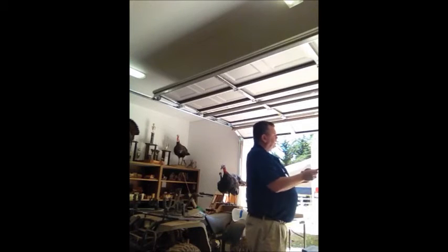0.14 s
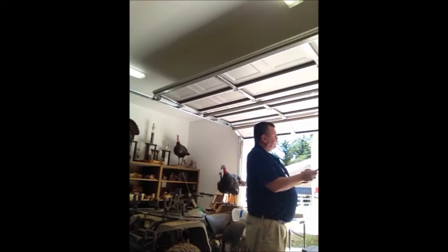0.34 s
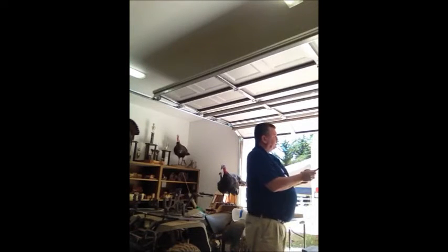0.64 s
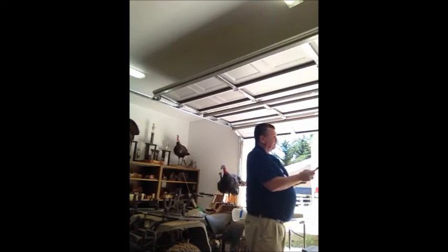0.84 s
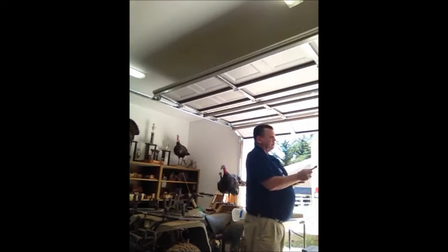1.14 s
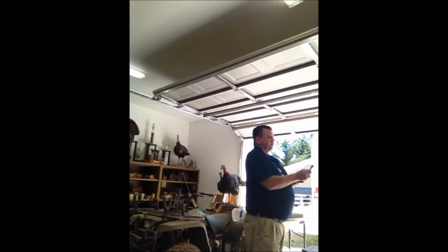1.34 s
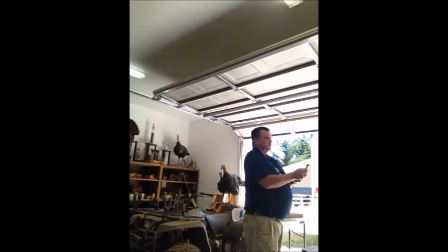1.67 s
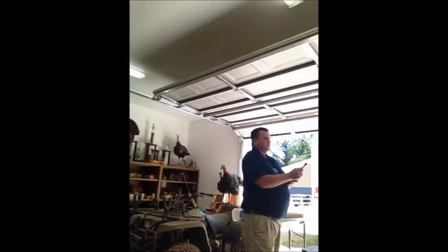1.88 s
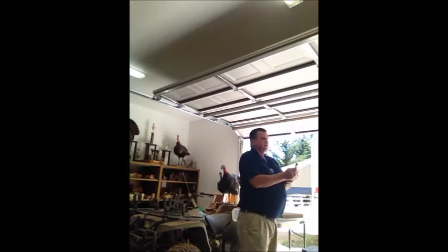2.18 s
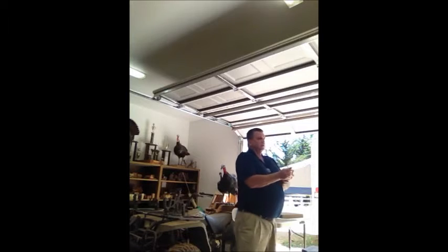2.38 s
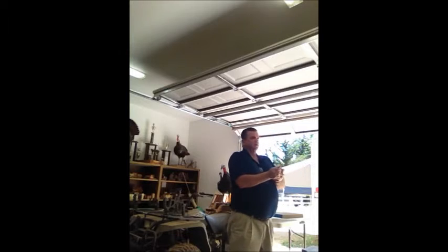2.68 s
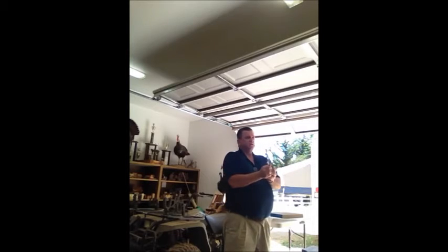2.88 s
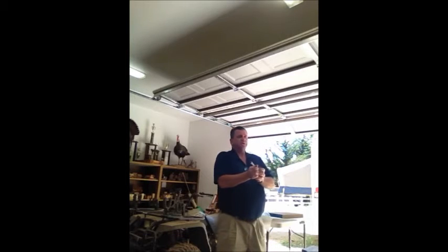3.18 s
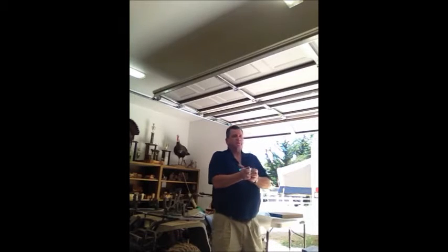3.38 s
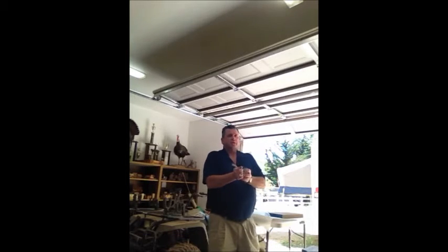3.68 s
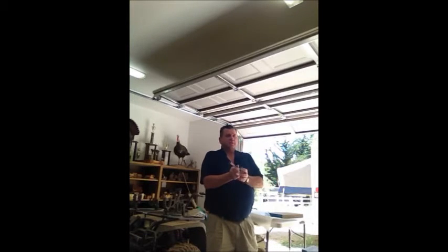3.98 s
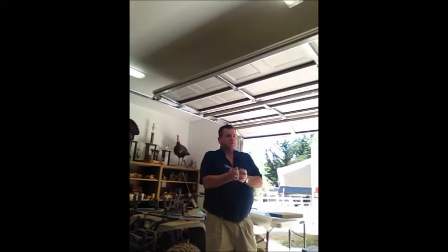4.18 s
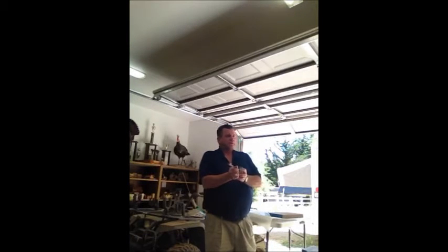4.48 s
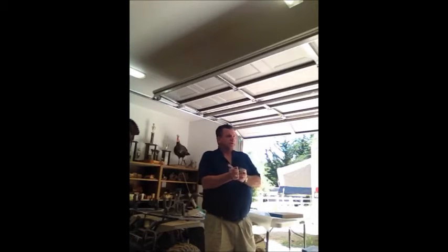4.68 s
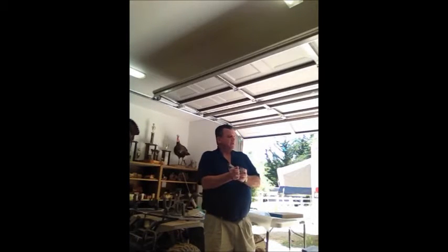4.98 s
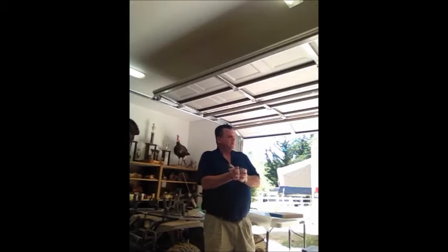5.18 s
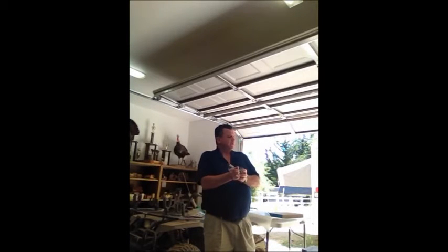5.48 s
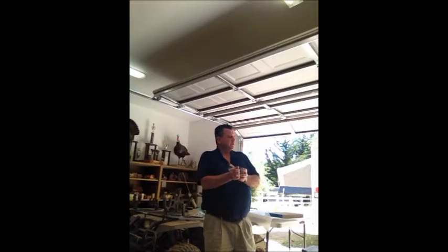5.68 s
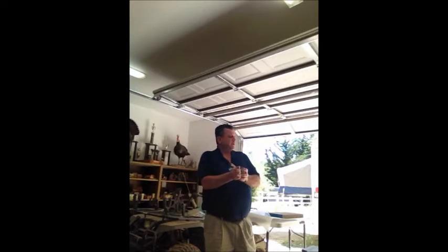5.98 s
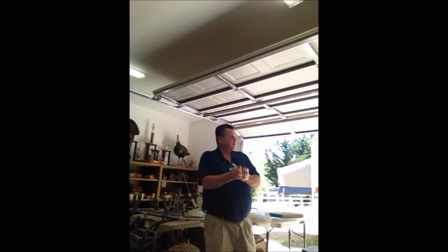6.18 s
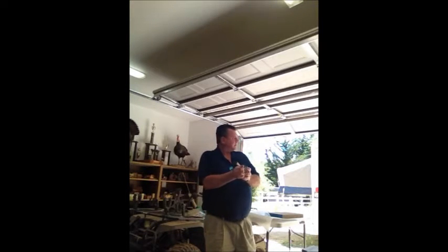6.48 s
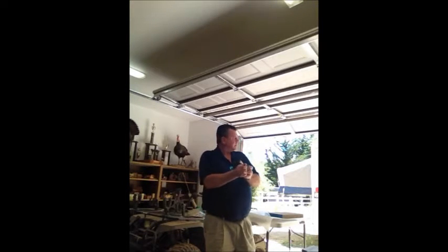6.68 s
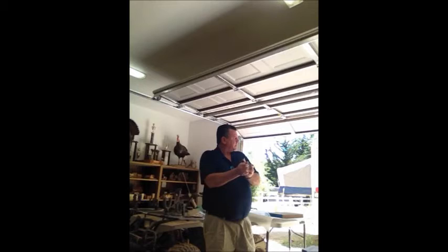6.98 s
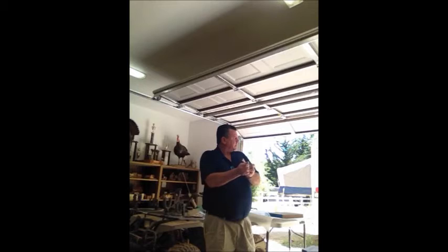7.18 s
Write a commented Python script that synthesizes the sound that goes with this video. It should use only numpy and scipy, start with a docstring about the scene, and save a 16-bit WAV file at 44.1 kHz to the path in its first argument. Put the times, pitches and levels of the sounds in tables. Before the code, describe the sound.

Hand-scraped turkey call: thin squeaks breaking into harsh, nasal yelps, about three a second at the fastest, then silence and two clucks in a bare garage.

```python
"""An open garage: a hand-held friction turkey call played a few metres from a phone.
Each stroke starts as a thin stick-slip whistle, then breaks down into a loud rasp: eleven yelps,
a light touch of the striker and two short clucks. Slip pulses and grit noise ring the plate and chamber.
Filtered noise makes the outdoor hush, a far rush and faint handling rustles.
The bare room rings on as decaying noise; the phone limits the peaks."""
import sys
import numpy as np
from scipy import signal
from scipy.fft import rfft, irfft
from scipy.io import wavfile
from scipy.ndimage import uniform_filter1d, minimum_filter1d

SR = 44100
rng = np.random.default_rng(int(sys.argv[2]) if len(sys.argv) > 2 else 0)


def dump(signal):
    """Clip the signal to [-1, 1] and save it as 16-bit WAV at the path in sys.argv[1]."""
    limited = np.clip(np.atleast_2d(signal).T, -1, 1)
    pcm = np.round(limited * 32767).astype(np.int16)
    wavfile.write(sys.argv[1], SR, pcm)


N = 323694
TOP_HZ = 15500  # top of the slip overtones and of the phone's band


def undb(db):
    """Decibels to gain."""
    return 10 ** (np.asarray(db) / 20)


def unit(x):
    """Scale to rms 1."""
    return x / np.sqrt(np.mean(x ** 2))


def on_log_axis(points, hz):
    """Read (Hz, value) points on a log-frequency axis."""
    at, value = np.transpose(points)
    return np.interp(np.log(np.maximum(hz, 1)), np.log(at), value)


def noise(points):
    """Noise of rms 1, coloured by a curve of (frequency, level) points."""
    hz = np.fft.rfftfreq(N, 1 / SR)
    white = rng.standard_normal(N)
    return unit(irfft(rfft(white) * undb(on_log_axis(points, hz)), N))


def wander(t, rate):
    """Random drift: normal values, rate of them a second, joined by lines."""
    values = rng.standard_normal(4096)
    return np.interp(t * rate, np.arange(len(values)), values)


def add(track, at, sound):
    """Mix a sound into the track at a time in seconds."""
    i = int(at * SR)
    track[i:i + len(sound)] += sound[:N - i]


# colour of the outdoor hush: (frequency [Hz], relative level per Hz [dB])
HUSH_COLOUR = [(25, -26.5), (70, -18.5), (125, -2), (200, -1.5), (330, -5.5), (750, -7.5), (1100, -5.5),
               (2000, -12.5), (4400, -15.5), (5200, -18), (10000, -23), (14500, -21)]
HUSH_DB = -67


def outdoor_hush(t):
    """Air noise through the open door, with a slight flutter in level."""
    return noise(HUSH_COLOUR) * undb(HUSH_DB + 0.46 * wander(t, 9))


# colour of the far, hollow rush: (frequency [Hz], relative level per Hz [dB])
FAR_COLOUR = [(200, -30.5), (520, -9.5), (820, -2), (980, -6), (1150, -8.5), (1700, -15.5), (4000, -37)]
FAR_DB, FAR_SWELL_S = -69, 6.3  # mean level on reaching the swell time; the rise goes on after it


def far_rush(t):
    """A hollow band of noise outdoors that swells in a straight line from nothing."""
    return noise(FAR_COLOUR) * t / FAR_SWELL_S * undb(FAR_DB + wander(t, 4))


# colour of the rustle: (frequency [Hz], relative level per Hz [dB])
RUSTLE_COLOUR = [(60, -30), (250, -13), (400, -0.5), (600, -7), (1800, -5.5), (2400, -11), (4400, -10.5),
                 (6000, -20), (15000, -21)]
# faint rustles of handling: (middle [s], half length [s], level at the middle [dB])
RUSTLES = [(.01, 0.16, -61), (0.66, 0.11, -66.5)]


def handling_rustle(t):
    """Hands shifting on the call: soft bell-shaped swells of uneven noise."""
    handling = sum(undb(db) * np.exp(-((t - middle) / half) ** 2) for middle, half, db in RUSTLES)
    return noise(RUSTLE_COLOUR) * handling * undb(1.5 * wander(t, 40))


# garage reverberation: (frequency [Hz], time to fall by 60 dB [s])
REVERB_TIMES = [(300, 0.51), (1350, 0.7), (2000, 0.56), (3000, 0.65), (4200, 0.63), (8000, 0.52),
                (14000, 0.34)]


def garage(x, early_db=-5, early_s=0.0095, tail_db=-6, direct_db=-1.0):
    """Direct sound, a quick cluster off door and ceiling, and a diffuse tail that dulls as it fades."""
    t = np.arange(SR) / SR
    hz, frames, cells = signal.stft(rng.standard_normal(SR), SR, nperseg=256)
    fading = np.exp(-np.log(1000) * frames / on_log_axis(REVERB_TIMES, hz)[:, None])
    tail = signal.istft(cells * fading, SR)[1][:SR]
    tail = tail * (1 - np.exp(-t / 0.0039))  # the tail builds up softly
    sparse = rng.standard_normal(SR) * (rng.random(SR) < .012)
    early = sparse * np.exp(-t / early_s) * (t > .002)
    response = (undb(tail_db) * unit(tail) + undb(early_db) * unit(early)) / np.sqrt(SR)
    return undb(direct_db) * x + signal.fftconvolve(x, response)[:N]


# broad response of plate and sound chamber: (frequency [Hz], level [dB])
BODY = [(60, -58), (200, -46.5), (470, -43.5), (640, -38), (860, -35), (1060, -19), (1280, -0.5),
        (1950, -4), (2230, -20.5), (2680, -17.5), (3200, -20), (4650, -25.5), (5200, -33.5), (7300, -34.5),
        (15000, -56)]
# plate modes and dips on top of it: (frequency [Hz], width [Hz], lift [dB])
PLATE_MODES = [(1361, 75, 2.5), (1640, 110, 3), (1770, 170, 1), (2464, 160, -8), (2898, 70, 6),
               (3010, 55, 8), (3208, 40, 8.5), (3416, 120, -8), (3950, 30, 3), (4036, 60, 6),
               (5100, 150, -7), (5755, 130, 8.5), (6490, 140, 6), (6870, 93, 7.5), (7720, 80, 6),
               (8570, 470, -6), (9360, 120, 7), (10120, 230, 5.5), (11610, 180, 11), (12900, 400, 4.5)]
# a narrow anti-resonance of the chamber, before tuning: (frequency [Hz], width [Hz], lift [dB])
HOLLOW = (2255, 90, -18)


def body(bite_db, tuning=1, size=4096):
    """Causal impulse response of the call; a harder bite lifts the overtones, the hand tunes the chamber."""
    hz = np.fft.rfftfreq(size, 1 / SR)
    bite_weight = on_log_axis([(1900, 0.088), (3000, 0.89), (10000, 2.0)], hz)
    db = on_log_axis(BODY, hz / tuning) + bite_db * bite_weight
    hollow = (HOLLOW[0] * tuning, *HOLLOW[1:])
    for centre, width, lift_db in PLATE_MODES + [hollow]:
        db = db + lift_db / (1 + (2 * (hz - centre) / width) ** 2)
    # fold the cepstrum to get minimum phase: the ring starts at once
    cepstrum = irfft(np.log(undb(db)))
    cepstrum[1:size // 2] *= 2
    cepstrum[size // 2 + 1:] = 0
    return irfft(np.exp(rfft(cepstrum)))


# the striker touches the plate: (start [s], length [s], level before the room [dB])
TOUCH = (6.110, 0.031, -42)


def light_touch(call, bite_db=-10):
    """A brief soft scuff of the striker: a fading noise burst rings the plate."""
    start, length, db = TOUCH
    t = np.arange(int(length * SR)) / SR
    push = (1 - np.exp(-t / .002)) * np.exp(-2 * t / length)
    scuff = rng.standard_normal(SR)[:len(t)] * push
    sound = signal.fftconvolve(scuff, body(bite_db))
    add(call, start, sound * undb(db) * np.sqrt(len(t) / np.sum(sound ** 2)))


def slips(phase, hz, odd, roll_db, count=22):
    """Pulses, two a cycle; as the odd harmonics near full strength every second pulse drops out."""
    k = np.arange(1, count + 1)[:, None]
    roll = undb(roll_db * np.log2(np.maximum(k / 2, 1)))  # soft slips lose overtones
    strength = np.where(k % 2, odd, 1) * roll
    in_band = k * hz < TOP_HZ
    return np.sum(np.cos(k * phase) * in_band * strength, axis=0)


# the opening whistle: strength of its odd harmonics, fall of its overtones [dB per octave]
WHISTLE_ODD, WHISTLE_ROLL_DB = 0.31, -8
# extra strength of its lowest tone; longest fade-in [s]
WHISTLE_FUNDAMENTAL, WHISTLE_FADE_S = .35, .008
SMOOTH_ODD, RASP_ODD = .55, .98  # odd harmonics at the break, in a smooth and in a fully rough stroke
STUMBLE, STUMBLE_RATE = .12, 70  # deepest slowing of the slips (share), chances a second
SING_HZ, SING_SPREAD = 1655, .025  # plate tone before tuning, its spread between strokes (share)
SCRAPE, SPURT_DB = 1.7, 4.5  # grit at full roughness against the slips, typical swing of its spurts
EASE_S, EASE_DB = 0.028, -4.5  # after the break the bite eases off: time constant, change of bite
BEND, LIFT_S = .012, .0028  # slow pitch bend at full roughness (share), time constant of the lift-off


def stroke(snap, length, high_hz, low_hz, db, opening_db, rasp, bite_db, tuning=1, knock=0, sing=1):
    """Stick-slip grips harder until the break at snap seconds: slips slow, sharpen, grow loud and uneven."""
    t = np.arange(int((length + .05) * SR)) / SR  # leaves room for the lift-off
    progress = np.clip(t / snap, 0, 1)
    # the pitch sags gently at first, then drops over the break; rough strokes sag sooner and further
    drop = (.28 + .34 * rasp) * progress ** (1.8 - .6 * rasp)
    drop = drop + (1 - drop[-1]) * progress ** 12
    hz = high_hz + (low_hz - high_hz) * drop
    rough = .07 + rasp * drop ** 1.24

    # the pitch wavers, and rough slips stumble now and then to a slower rate
    waver = (.012 + .022 * rough) * wander(t, 600)
    waver = waver + (.007 + .012 * rough) * wander(t, 90.2) + BEND * rough * wander(t, 30)
    stumble = STUMBLE * rasp ** 2 * drop ** 4 * np.clip(4 * wander(t, STUMBLE_RATE) - 2.2, 0, 1)
    phase = 2 * np.pi * np.cumsum(hz * (1 + waver - stumble)) / SR

    # in the rasp single slips come early or late, and strong and weak ones alternate
    break_odd = SMOOTH_ODD + (RASP_ODD - SMOOTH_ODD) * rasp
    odd = WHISTLE_ODD + (break_odd - WHISTLE_ODD) * drop ** 2
    jitter = (0.043 + .13 * rough) * wander(t, 900)
    pulses = slips(phase + jitter, hz, odd, WHISTLE_ROLL_DB * (1 - progress))
    alternation = 0.26 * rough * np.cos(phase / 2 + 1.1 * wander(t, 120))
    pulses = pulses * (1 + alternation + .5 * rough * wander(t, 600))

    # a plate tone sings against the slips and shakes the contact, which adds sum and difference tones
    detune = 1 + SING_SPREAD * rng.standard_normal() + .016 * wander(t, 150)
    plate_hz = SING_HZ * tuning ** .7 * detune
    plate = sing * rough * np.cos(2 * np.pi * np.cumsum(plate_hz) / SR)
    fundamental = (knock + WHISTLE_FUNDAMENTAL * (1 - drop) ** 2) * np.cos(phase)
    pulses = pulses * (1 + .7 * plate) + 0.68 * plate + fundamental

    # the tip scrapes over the grit in ragged spurts
    scrape = SCRAPE * rough * rng.standard_normal(SR)[:len(t)] * undb(SPURT_DB * wander(t, 400))

    # light strokes stay quiet until just before the break; rough ones swell evenly
    grip = np.minimum(progress / (.92 - .12 * rasp), 1) ** (2.8 - 2.3 * rasp)
    lift = np.exp(-np.maximum(t - length, 0) / LIFT_S)
    fade_in = np.minimum(t / min(WHISTLE_FADE_S, snap / 2), 1)
    unsteady_db = (1.63 + 1.6 * rasp) * wander(t, 130)
    pressure = undb(opening_db * (1 - grip) + unsteady_db) * lift * fade_in

    # full bite up to the break, then a crossfade to a duller body as the hand eases off
    push = (pulses + scrape) * pressure
    fresh = np.exp(-np.maximum(t - snap, 0) / EASE_S)
    sharp = signal.fftconvolve(push * fresh, body(bite_db, tuning))
    dull = signal.fftconvolve(push * (1 - fresh), body(bite_db + EASE_DB, tuning))
    sound = sharp + dull
    return sound * undb(db) * np.sqrt(np.sum(pressure ** 2) / np.sum(sound ** 2))


# clucks: (start [s], length to lift-off [s], slip-cycle rate after the break [Hz],
#          level at full pressure before the room [dB])
CLUCKS = [(6.375, 0.046, 698.3, -8.5), (7.062, 0.016, 712, -4.5)]
CLUCK_OPEN_HZ, CLUCK_BREAK_S, CLUCK_OPENING_DB = 851, 0.00398, -12.5
CLUCK_RASP, CLUCK_BITE_DB = 0.773, 0.5  # roughness 0-1, lift of the overtones before weighting
CLUCK_KNOCK, CLUCK_SING = 0.47, 0.39  # extra fundamental, share of the plate tone stirred by a flick


def clucks(call):
    """Flicks of the striker that break almost at once: hardly any whistle, just a short bright rasp."""
    for start, length, hz, db in CLUCKS:
        sound = stroke(CLUCK_BREAK_S, length, CLUCK_OPEN_HZ, hz, db, CLUCK_OPENING_DB,
                       CLUCK_RASP, CLUCK_BITE_DB, knock=CLUCK_KNOCK, sing=CLUCK_SING)
        add(call, start, sound)


# yelps: (start [s], break into the rasp [s], lift-off [s], force on the striker [0-1],
#         level at full pressure before the room [dB])
YELPS = [ (0.689, 0.766, .820, 0.09, -17), (1.092, 1.205, 1.270, .53, -13.5),
         (1.524, 1.595, 1.666, .85, -10.5), (1.885, 1.938, 2.014, 0.91, -9.5),
         (2.238, 2.296, 2.356, .98, -9), (2.591, 2.626, 2.668, 0.98, -7.5),
         (2.905, 2.955, 3.018, 0.97, -8.5), (3.249, 3.29, 3.348, 0.95, -10),
         (3.582, 3.633, 3.711, 0.98, -10), (3.981, 4.043, 4.122, 0.98, -8), (4.384, 4.449, 4.521, 1, -10), ]
# the chamber's tuning falls as the hand settles around it: (time [s], frequency ratio [1])
CHAMBER = [(1.1, 1.094), (1.53, 1.065), (1.89, 1.0)]
# slip-cycle rate as the stroke opens: (lightest touch [Hz], full force [Hz])
WHISTLE_HZ = (964.5, 1061)
# slip-cycle rate after the break: (lightest touch [Hz], full force [Hz])
RASP_HZ = (799.7, 646.5)
# pressure of the opening against the rasp: (lightest touch [dB], full force [dB])
OPENING_DB = (-30, -17.5)
# lift of the overtones before weighting by frequency: (lightest touch [dB], full force [dB])
BITE_DB = (-7, 1)
RASP_POWER = 2.017  # roughness grows as force to this power


def yelps(call):
    """Drawn strokes: more force opens higher and louder, and breaks lower, rougher and brighter."""
    for start, snap, end, force, db in YELPS:
        high_hz, low_hz, opening_db, bite_db = (
            light + (full - light) * force
            for light, full in (WHISTLE_HZ, RASP_HZ, OPENING_DB, BITE_DB))
        rasp = np.clip(force, 0, 1) ** RASP_POWER
        tuning = np.interp(start, *np.transpose(CHAMBER))
        sound = stroke(snap - start, end - start, high_hz, low_hz, db, opening_db, rasp, bite_db, tuning)
        add(call, start, sound)


def scene():
    """The call rings in the garage, over handling rustles, the outdoor hush and the far rush."""
    t = np.arange(N) / SR
    background = outdoor_hush(t) + far_rush(t) + handling_rustle(t)
    call = np.zeros(N)
    light_touch(call)
    clucks(call)
    yelps(call)
    return (background + garage(call))[None]


def record(dry, ceiling=0.88, size=265):
    """The phone: a fast limiter holds the peaks to the ceiling, then a steep filter cuts the top."""
    gain = np.minimum(1, ceiling / (np.abs(dry) + 1e-9))
    gain = uniform_filter1d(minimum_filter1d(gain, size), size)  # size in samples
    top_cut = signal.ellip(8, .2, 70, TOP_HZ, fs=SR, output="sos")
    return signal.sosfilt(top_cut, dry * gain)


dry = scene()
out = record(dry)
dump(out)
```